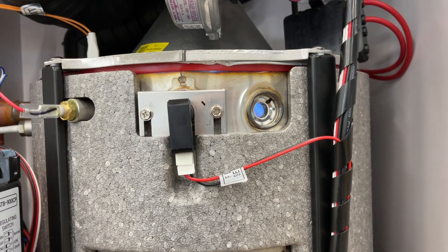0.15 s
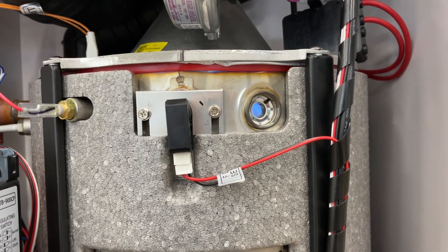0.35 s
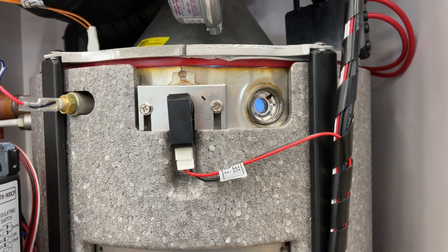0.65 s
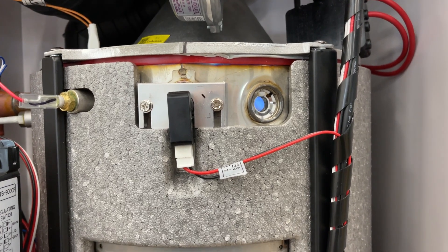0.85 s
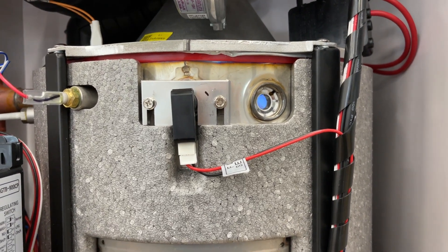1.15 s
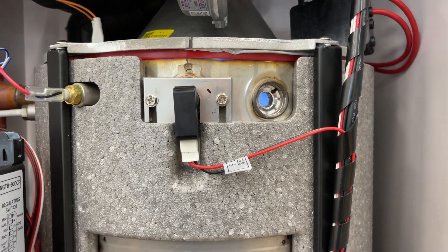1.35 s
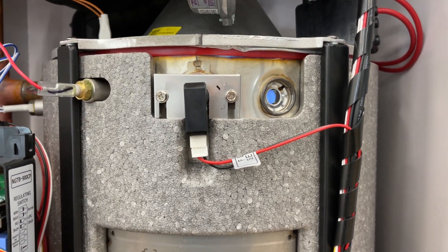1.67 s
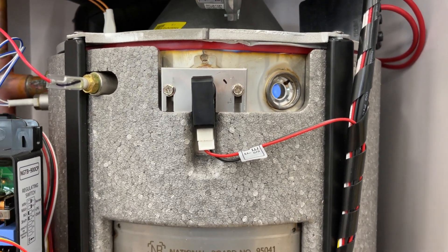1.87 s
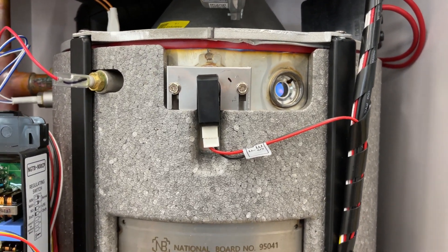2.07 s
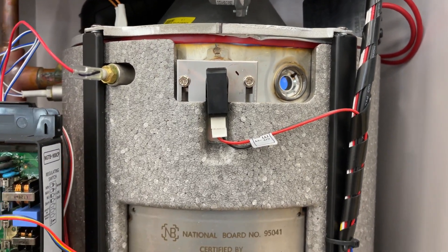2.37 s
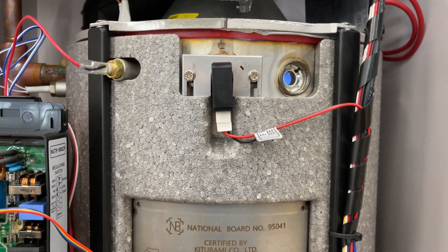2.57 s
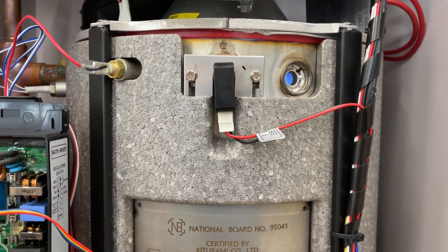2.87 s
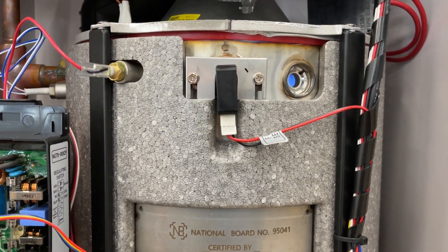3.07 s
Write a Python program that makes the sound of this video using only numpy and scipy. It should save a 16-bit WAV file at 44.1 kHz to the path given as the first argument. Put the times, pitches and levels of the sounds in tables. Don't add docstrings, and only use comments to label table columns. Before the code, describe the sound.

A gas boiler drones continuously, its low flue note wavering and swelling irregularly several times a second, stronger near 0.4 and 2.3 s. Beneath are fan rumble and faint motor whine; rushing air rings in the casing under fine, smooth gas hiss. A tiny click follows a very brief opening silence. Dull knocks come at 1.3 and 1.5 s, a higher tap at 2.2, with scattered faint cloth rustles. Close, small room.

```python
import sys
import numpy as np
from scipy import signal
from scipy.fft import rfft, irfft, next_fast_len
from scipy.io import wavfile
from scipy.ndimage import uniform_filter1d, map_coordinates

SR = 44100
rng = np.random.default_rng(int(sys.argv[2]) if len(sys.argv) > 2 else 0)


def linear_from_db(decibels):
    return 10 ** (np.asarray(decibels, float) / 20)


def file_out(sig):
    cols = np.atleast_2d(sig).T
    lim = np.clip(cols, -1, 1)
    pcm = np.round(lim * 32767).astype(np.int16)
    wavfile.write(sys.argv[1], SR, pcm)


N = 142002


def unit(x):
    return x / np.sqrt(np.mean(x ** 2) + 1e-20)


def along(points, hz, **ends):
    f, v = np.transpose(points)
    return np.interp(np.log(hz + 1), np.log(f + 1), v, **ends)


def wobble(rate):
    return map_coordinates(rng.standard_normal(400), [np.arange(N) * rate / SR])


def filtered(x, response):
    m = next_fast_len(x.shape[-1] + 8192)
    spectrum = rfft(x, m) * response(np.fft.rfftfreq(m, 1 / SR))
    return irfft(spectrum, m)[..., :x.shape[-1]]


def peak(hz, centre_hz, width_hz):
    return 1j * hz * width_hz / (centre_hz ** 2 - hz ** 2 + 1j * hz * width_hz)


def rush(density, patchy_db):
    z = signal.stft(rng.standard_normal((2, N + 512)), nperseg=512)[2]
    patches = uniform_filter1d(rng.standard_normal(z.shape[1:]), size=6, axis=0)
    patches = uniform_filter1d(patches, size=10, axis=1)
    patchy = signal.istft(z * linear_from_db(patchy_db * unit(patches)), nperseg=512)[1]
    pair = unit(patchy[:, :N])
    return filtered(pair, lambda hz: np.sqrt(SR / 2) * linear_from_db(along(density, hz, left=-140, right=-140)))


def flue():
    # time in seconds, half length in seconds, level in dB.
    surges = [(0.113, 0.043, -29.5), (0.256, 0.041, -22.0), (0.343, 0.012, -28.1), (0.426, 0.061, -17.7),
              (0.619, 0.032, -25.4), (0.772, 0.054, -22.2), (0.912, 0.02, -23.5), (1.02, 0.038, -22.5),
              (1.13, 0.029, -22.9), (1.23, 0.017, -24.3), (1.322, 0.045, -21.7), (1.454, 0.031, -25.3),
              (1.516, 0.015, -21.6), (1.6, 0.034, -22.8), (1.676, 0.021, -19.1), (1.774, 0.025, -23.4),
              (1.884, 0.027, -24.1), (1.949, 0.016, -22.5), (2.043, 0.046, -21.5), (2.15, 0.015, -24.0),
              (2.197, 0.035, -27.8), (2.321, 0.034, -17.9), (2.403, 0.022, -19.7), (2.588, 0.072, -25.3),
              (2.681, 0.015, -23.3), (2.813, 0.045, -22.6), (2.967, 0.033, -25.5), (3.045, 0.013, -27.3),
              (3.145, 0.029, -21.1)]
    flue_hz, drift_hz, turbulence_width_hz = 223.2, 2.595, 40
    turbulence_db, wall_return_db = -19, -9
    t = np.arange(N) / SR
    pitch_hz = flue_hz + drift_hz * wobble(11)
    note = np.sqrt(2) * np.sin(2 * np.pi * np.cumsum(pitch_hz) / SR)
    noise = rng.standard_normal((2, N))
    gust = unit(filtered(noise, lambda hz: peak(hz, flue_hz, turbulence_width_hz) ** 2))
    strength = sum(linear_from_db(db) * np.exp(-.5 * ((t - s) / half) ** 2) for s, half, db in surges)
    sway = linear_from_db(.6 * wobble(25.56))
    direct_only = np.array([[1], [0]])
    return strength * sway * (note * direct_only + linear_from_db([[turbulence_db], [wall_return_db]]) * gust)


def blower_tones():
    # multiple, level in dB.
    orders = [(1, -52), (3, -55), (4, -70), (8, -64), (9, -60), (10, -65), (12, -62), (13, -54), (22, -67),
              (23, -66)]
    # frequency in Hz, level in dB.
    whines = [(5437, -76), (6293, -74), (6525, -73), (11863, -78), (11953, -79)]
    shaft_hz, speed_drift, unsteady_db = 90.1, .0006, 1.8
    seconds_turned = np.cumsum(1 + speed_drift * wobble(2)) / SR
    quarter_cycle = np.array([[0], [.25]])
    lines = [(k * shaft_hz, db) for k, db in orders] + [(hz, db) for hz, db in whines]
    tones = np.zeros((2, N))
    for hz, db in lines:
        level = linear_from_db(db + unsteady_db * wobble(4.83))
        cycles = hz * seconds_turned + rng.random() + quarter_cycle
        tones += level * np.sqrt(2) * np.sin(2 * np.pi * cycles)
    return tones


def blower_air():
    # frequency in Hz, density in dB per Hz.
    air_density = [(300, -94), (420, -81.5), (900, -77.5), (1600, -80.5), (3200, -83), (4100, -87),
                   (6300, -88), (7600, -104)]
    # frequency in Hz, width in Hz, height in dB over the air.
    casing = [(421, 36, 8.5), (531, 17, 13), (677, 28, 8), (750, 42, 7.5), (1204, 46, 13), (2112, 50, 9),
              (3250, 200, 1.5), (5450, 170, 2)]
    # frequency in Hz, density in dB per Hz.
    rumble_density = [(22, -90), (36, -65.5), (60, -63.5), (90, -58.5), (140, -66.5), (200, -53),
                      (275, -61.5), (325, -75.5)]

    def ringing(hz):
        return np.sqrt(1 + sum((linear_from_db(db) ** 2 - 1) * abs(peak(hz, c, w)) ** 2 for c, w, db in casing))

    air = filtered(rush(air_density, patchy_db=1.2), ringing) * linear_from_db(.35 * wobble(6))
    return air + rush(rumble_density, patchy_db=0.5)


def jet():
    # frequency in Hz, density in dB per Hz.
    hiss_density = [(6800, -100), (7600, -90.5), (8600, -88.5), (9700, -86), (10400, -80.5), (11100, -86.5),
                    (12200, -96.5), (13200, -113)]
    breathing_db = .3 * wobble(3) + .6 * wobble(11)
    return rush(hiss_density, patchy_db=.9) * linear_from_db(breathing_db)


def strike(blows, body):
    contact_db = 19
    out = np.zeros((2, N + SR))
    t = np.arange(SR // 4) / SR
    for s, db, tilt_db, t60 in blows:
        scuff = linear_from_db(-60 * t / t60) * rng.standard_normal((2, len(t)))
        scuff += linear_from_db(contact_db) * (t == 0)

        def modes(hz):
            return sum((-1) ** k * linear_from_db(g + tilt_db * np.log2(c / 1000)) * peak(hz, c, w)
                       for k, (c, w, g) in enumerate(body))

        ring = filtered(scuff, modes)
        out[:, round(s * SR):][:, :len(t)] += linear_from_db(db) * ring / abs(ring).max() * 2
    return out[:, :N]


def knocks():
    # start in seconds, level in dB, brightness in dB per octave,
    # t60 of the scuff in seconds.
    bumps = [
        (1.311, -31, 2.5, .16),
        (1.328, -39, -1, .12),
        (1.35, -41, 1, .1),
        (1.521, -35, 0, .1),
    ]
    taps = [
        (2.169, -33, 0, .08),
    ]
    # frequency in Hz, width in Hz, level in dB.
    panel = [(425, 27, 0), (515, 33, -3), (670, 75, -10), (1350, 30, -4), (1560, 60, -9), (1980, 40, -4),
             (2270, 40, -7), (2580, 60, -10), (3060, 150, -25), (3750, 400, -30)]
    small_part = [(673, 84, -8), (1360, 50, -2), (1650, 150, -5), (1990, 80, -3), (2500, 300, -14),
                  (3060, 200, -10), (3750, 500, -10)]
    return strike(bumps, panel) + strike(taps, small_part)


def rustles():
    # start in seconds, level in dB, centre in Hz, length in seconds.
    rubs = [
        (0.448, -45.5, 8400, .02),
        (0.532, -48, 8500, 0.013),
        (1.514, -53, 7500, 0.027),
        (2.205, -48, 9300, 0.051),
        (2.49, -49, 8500, 0.022),
        (2.592, -50.5, 8650, 0.043),
        (2.995, -42, 9900, 0.012),
        (3.2, -50, 9500, 0.022),
    ]
    out = np.zeros((2, N + SR))
    t = np.arange(SR // 4) / SR
    for s, db, centre_hz, length in rubs:
        noise = rng.standard_normal((2, len(t)))
        puff = unit(filtered(noise, lambda hz: peak(hz, centre_hz, 0.34 * centre_hz) ** 2))
        swell = np.sin(np.pi * np.clip(t / length, 0, 1)) ** 2
        out[:, round(s * SR):][:, :len(t)] += linear_from_db(db) * swell * puff
    return out[:, :N]


def diffuse(pair):
    # frequency in Hz, left-right likeness from 0 to 1.
    likeness = [(40, .985), (250, .97), (500, .9), (1500, .66), (2100, .82), (6500, .68), (8400, .99),
                (11700, .999)]

    def mid_and_side(hz):
        angle = np.arccos(np.clip(along(likeness, hz), 0, 1)) / 2
        return np.array([np.cos(angle), np.sin(angle)])

    mid, side = filtered(pair, mid_and_side)
    return np.array([mid + side, mid - side])


def scene():
    boiler = flue() + blower_tones() + blower_air() + jet()
    return diffuse(boiler + knocks() + rustles())


def band_limit(x):
    return signal.sosfilt(signal.butter(12, 13100, fs=SR, output="sos"), x)


def record(dry):
    # frequency in Hz, phase in radians by which the left port leads.
    left_lead = [(150, .1), (700, .4), (1800, -.3), (3000, .8), (6700, 0), (7400, 1), (8200, .6), (8600, 0)]
    # frequency in Hz, left over right in dB.
    left_over_right = [(60, 0), (220, .7), (600, 1.3), (1100, 2.7), (4500, 3.5), (6900, 5.5), (8400, 0)]
    # lower edge in Hz, upper edge in Hz.
    twist_band = [8600, 11860]
    start_s, click_db, click_decay_s = .0361, -18.5, 0.0011
    half = np.array([[.5], [-.5]])

    def ports(hz):
        lead = along(left_lead, hz) - np.interp(hz, twist_band, [0, 2 * np.pi])
        return linear_from_db(half * along(left_over_right, hz)) * np.exp(1j * half * lead)

    x = filtered(dry, ports)
    since = np.arange(N) / SR - start_s
    click = linear_from_db(click_db) * np.exp(-abs(since) / click_decay_s)
    x = (x - click) * (since > 0)
    return band_limit(x)


dry = scene()
out = record(dry)
file_out(out)
```